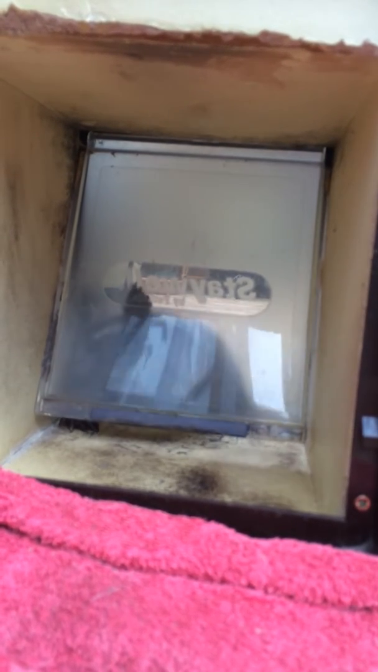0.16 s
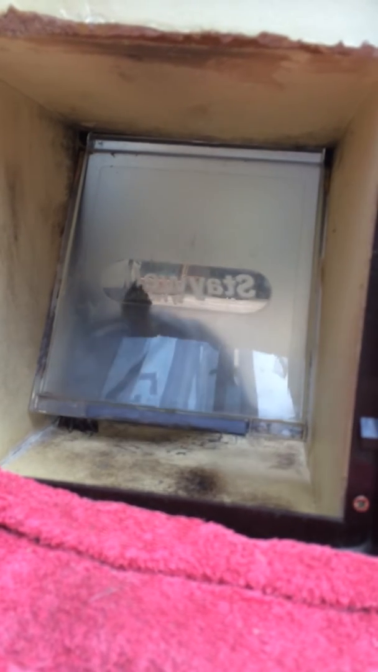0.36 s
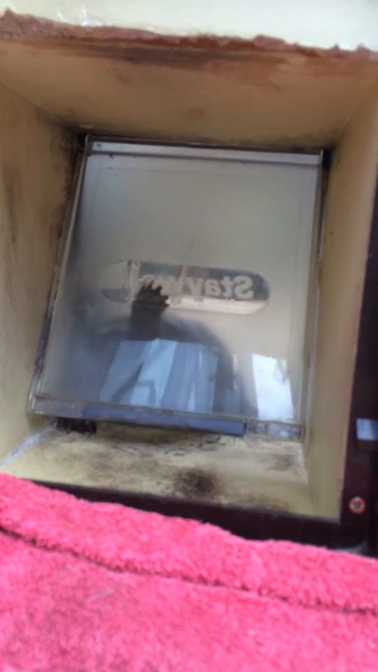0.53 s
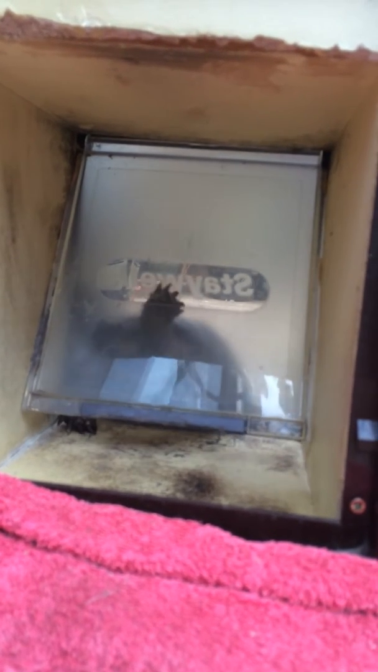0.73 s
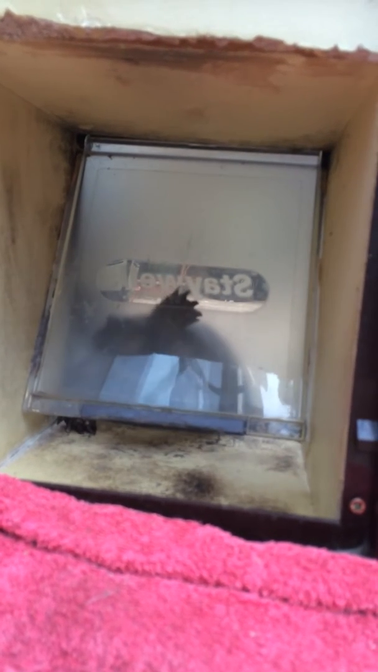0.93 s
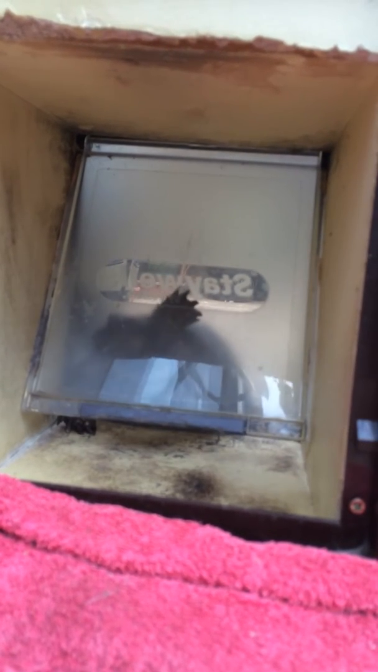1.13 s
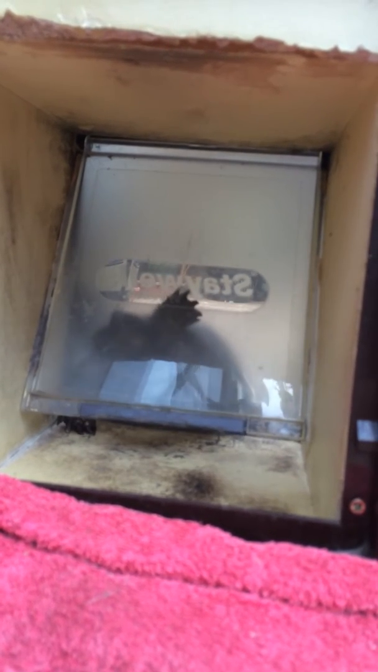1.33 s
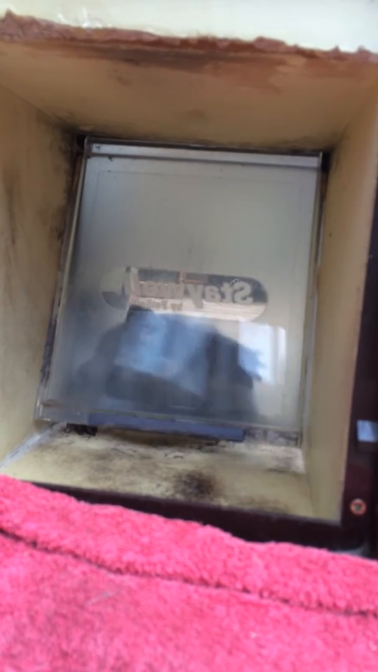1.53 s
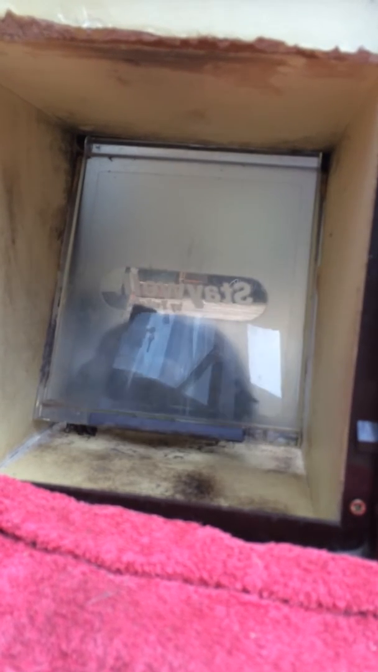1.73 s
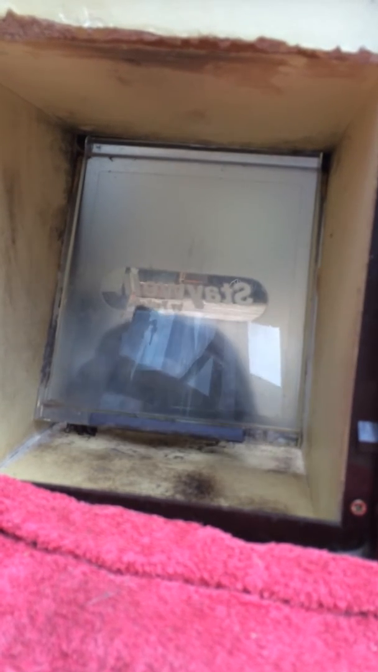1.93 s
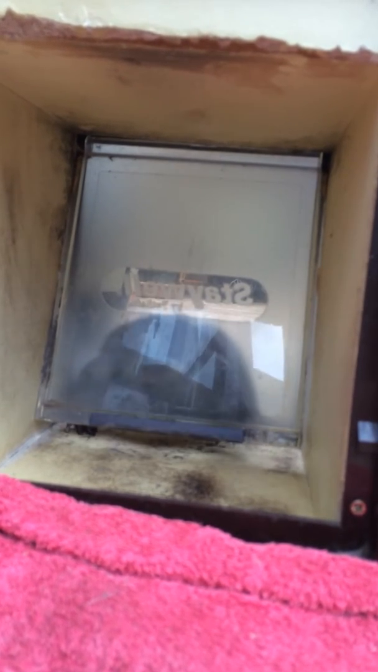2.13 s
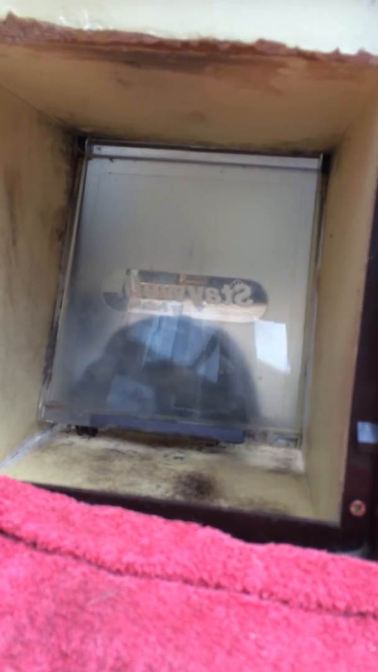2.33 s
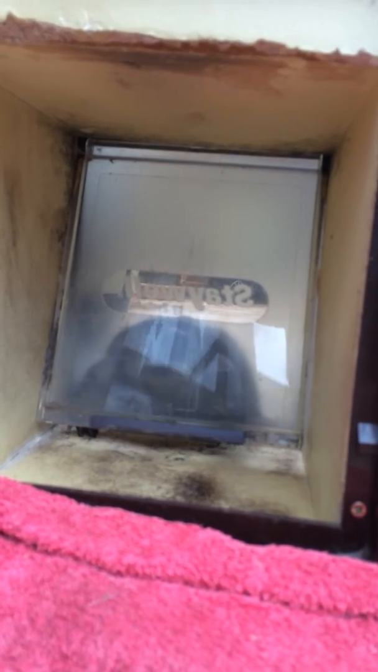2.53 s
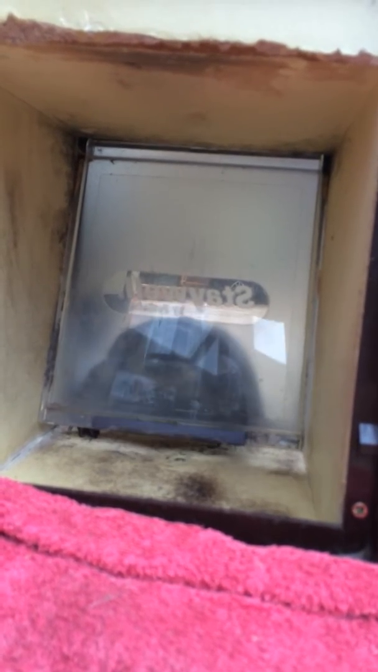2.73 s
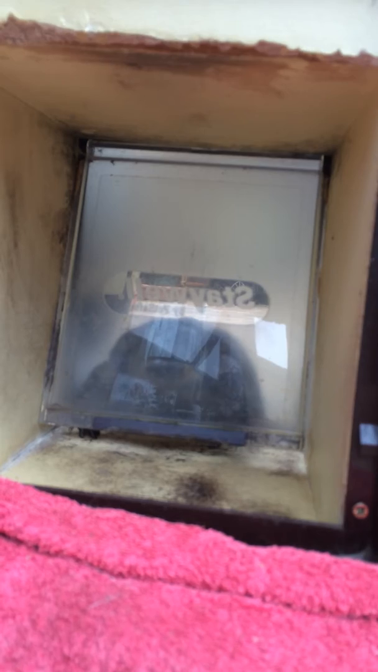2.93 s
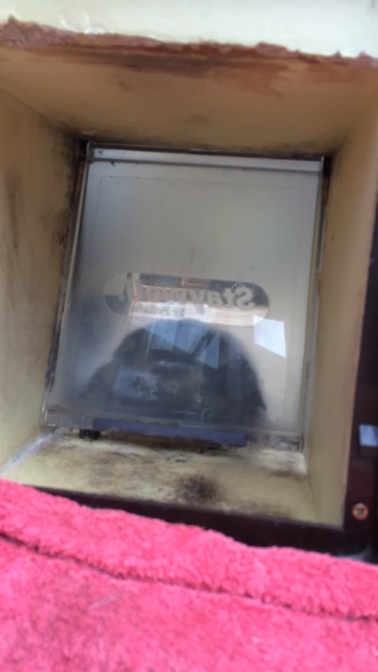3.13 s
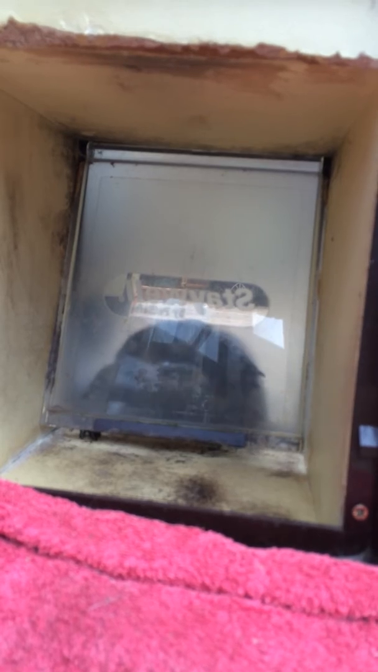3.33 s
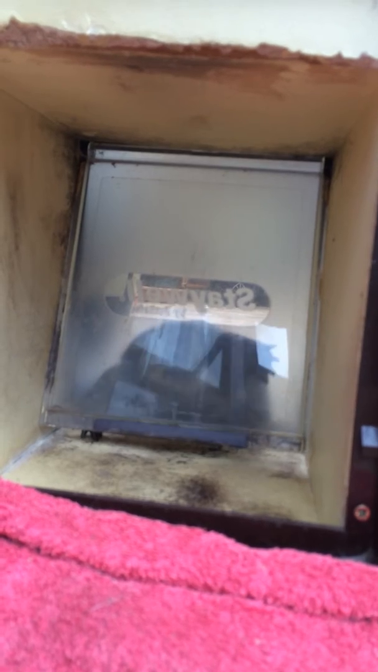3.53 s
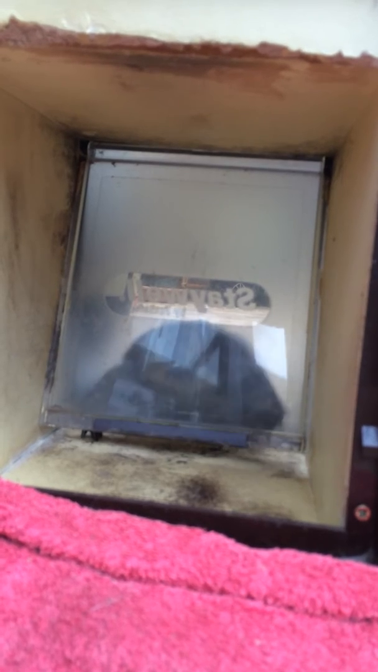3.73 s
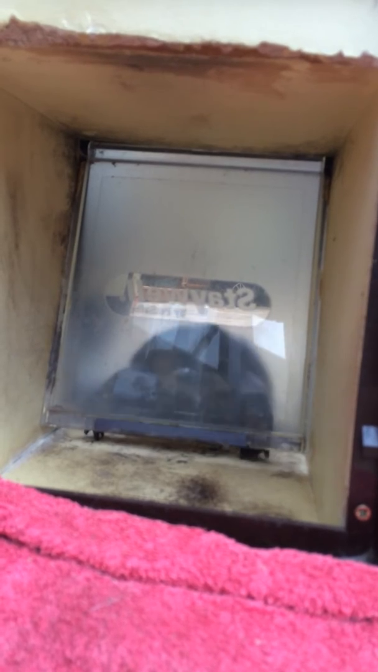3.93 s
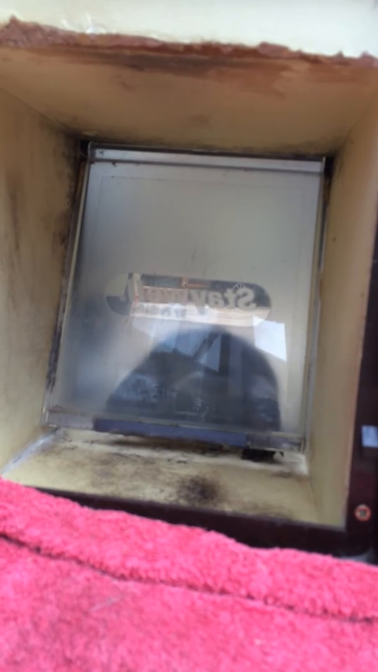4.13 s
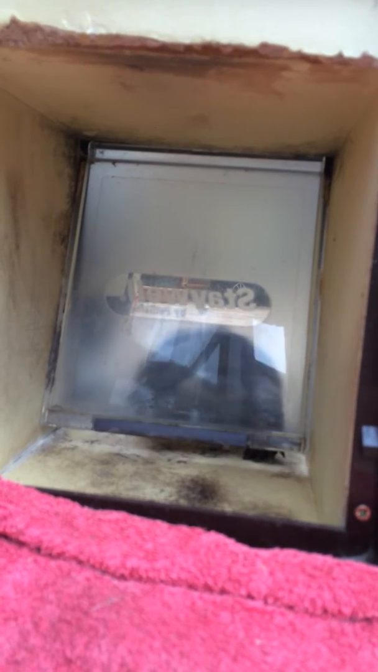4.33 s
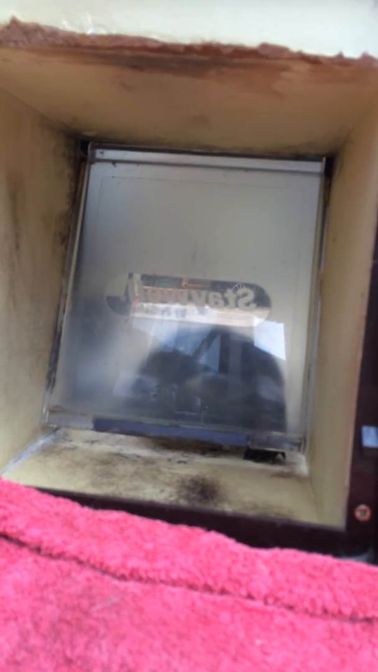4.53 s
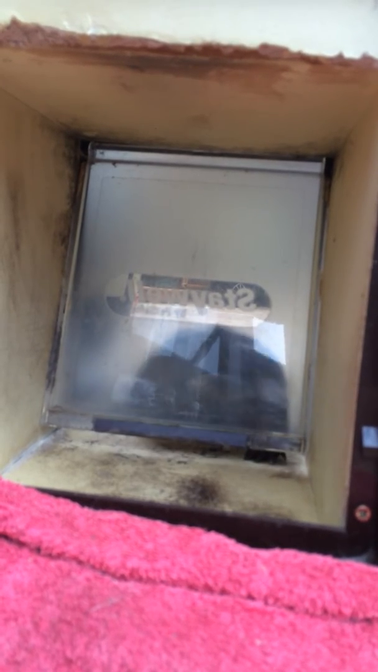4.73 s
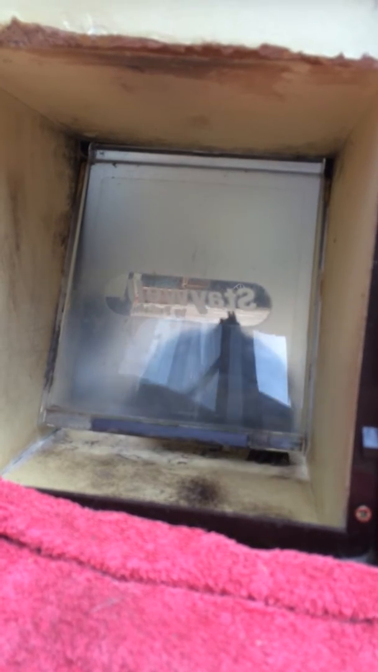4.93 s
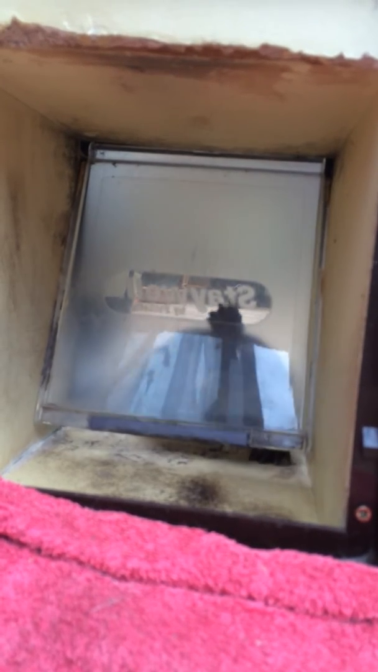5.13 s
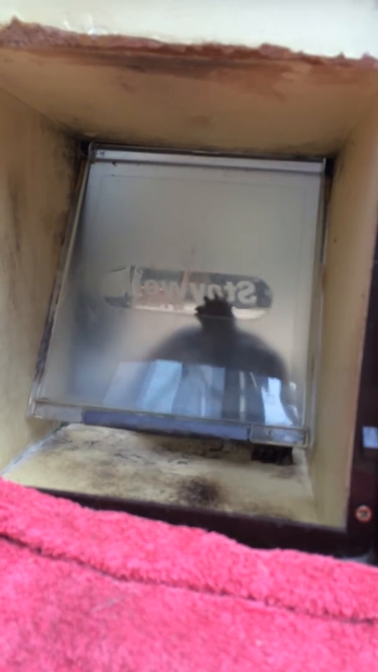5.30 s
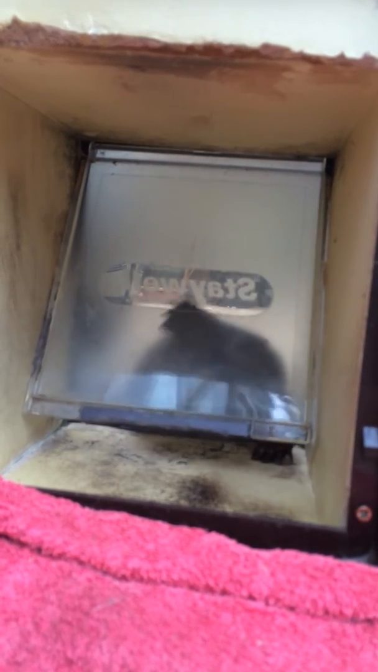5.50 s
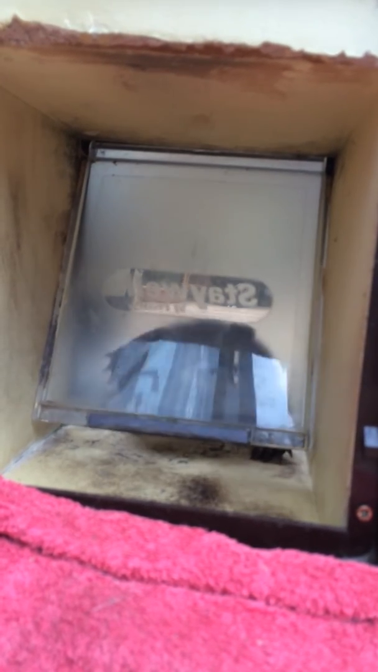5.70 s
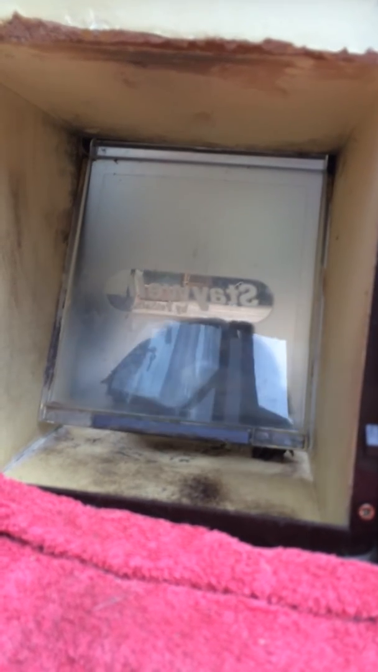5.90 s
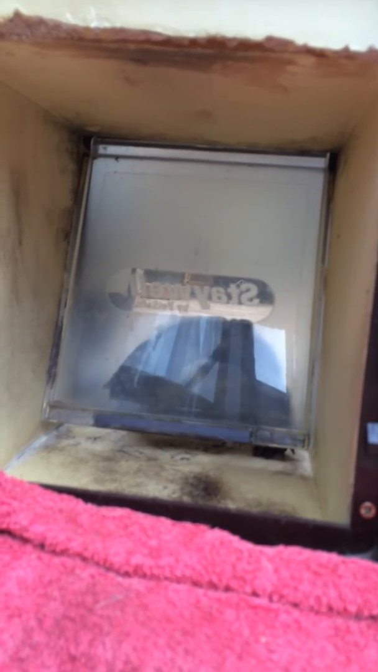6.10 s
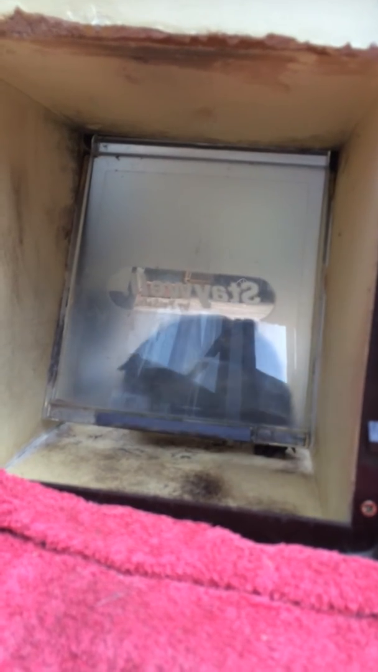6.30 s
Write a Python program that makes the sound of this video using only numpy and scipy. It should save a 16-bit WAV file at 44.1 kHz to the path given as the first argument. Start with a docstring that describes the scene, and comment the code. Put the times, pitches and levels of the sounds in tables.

```python
"""Animal at a cat flap

An animal pushes from outside at a plastic cat flap, close to a phone. The flap shudders, scrapes and
squeaks in its frame and knocks against its stop: the panel booms low, the plastic cracks. Stronger
blows are brighter, and the heaviest bounce once. Small plastic clicks and soft strokes of fur sound
among the knocks, over a quiet room."""
import sys
import numpy as np
from scipy import signal
from scipy.fft import rfft, irfft
from scipy.io import wavfile
from scipy.ndimage import uniform_filter1d

SR = 44100
rng = np.random.default_rng(int(sys.argv[2]) if len(sys.argv) > 2 else 0)


def master_out(mix):
    """Clip the mix to full scale and print it as 16-bit PCM to the path in sys.argv[1]."""
    frames = np.transpose(np.atleast_2d(mix))
    ceiling = np.clip(frames, -1, 1)
    pcm = np.round(ceiling * 32767).astype(np.int16)
    wavfile.write(sys.argv[1], SR, pcm)


N = 284886
TIME = np.arange(N) / SR
AGE = TIME[:SR // 2]  # seconds since a contact


def undb(db):
    """Decibels to gain."""
    return 10 ** (np.asarray(db) / 20)


def decay(t60_s):
    """Exponential decay after a contact."""
    return np.exp(-np.log(1000) * AGE / t60_s)


def unit_rms(x):
    """Scale to rms 1."""
    return x / np.sqrt(np.mean(x ** 2))


def unit_attack(x):
    """Scale to rms 1 over the first 20 ms."""
    return x / np.sqrt(np.mean(x[:SR // 50] ** 2))


def add(out, start_s, x):
    """Mix x into out from start_s."""
    i = max(int(start_s * SR), 0)
    out[i:i + len(x)] += x[:max(N - i, 0)]


def high_pass(x, corner_hz):
    """Second-order bass cut."""
    return signal.sosfilt(signal.butter(2, corner_hz, "high", fs=SR, output="sos"), x)


def colour(x, spectrum, size=4096):
    """Minimum-phase filter through (Hz, dB) points."""
    hz, db = np.transpose(spectrum)
    bin_hz = np.arange(size // 2 + 1) * SR / size
    gain = undb(np.interp(np.log(bin_hz + 1), np.log(hz), db))
    cepstrum = irfft(np.log(gain))
    cepstrum[1:size // 2] *= 2
    cepstrum[size // 2 + 1:] = 0
    response = irfft(np.exp(rfft(cepstrum)))
    return signal.fftconvolve(x, response)[:len(x)]


def drift(rate_hz):
    """Smooth random drift, rms 1."""
    hold = max(int(SR / rate_hz), 1)
    steps = np.repeat(rng.standard_normal(N // hold + 1), hold)
    return unit_rms(uniform_filter1d(uniform_filter1d(steps, hold), hold)[:N])


def ring(modes, scatter_db, detune):
    """Decaying modes; each contact point weights and detunes them a little."""
    draws = rng.standard_normal((len(modes), 2))
    return sum(undb(db + scatter_db * a) * decay(t60_s) * np.sin(2 * np.pi * hz * (1 + detune * b) * AGE)
               for (hz, db, t60_s), (a, b) in zip(modes, draws))


def slips(per_s, spread_db):
    """Stick-slip: randomly timed impulses of unequal size."""
    impulses = (rng.random(N) < per_s / SR) * rng.standard_normal(N)
    return impulses * undb(spread_db * rng.standard_normal(N))


def chatter(t60_s, first_db, tail_db, tail_t60_s):
    """One sharp contact, then a dying buzz of micro-contacts."""
    buzz = rng.standard_normal(len(AGE)) * (decay(t60_s) + undb(tail_db) * decay(tail_t60_s))
    buzz[0] = undb(first_db) * np.linalg.norm(buzz)
    return buzz


def hollow(x, t60_s, share_db):
    """Add the dense resonances of thin plastic, different at every contact point."""
    response = (rng.standard_normal(len(AGE)) * decay(t60_s))[:SR // 16]
    response *= undb(share_db) / np.linalg.norm(response)
    response[0] += 1
    return signal.fftconvolve(x, response)[:len(x)]


# Room background. Each row: frequency in Hz, relative level in dB.
ROOM_SPECTRUM = [(15, -48), (25, -26), (66, -0.5), (109, -4), (172, -2), (271, -16), (309, -8.5),
                 (344, -26.5), (769, -18), (1420, -25.5), (1860, -31), (2560, -36.5), (3630, -42.5),
                 (9270, -47.5), (15000, -45.5)]


def room_tone(level_db=-54.5):
    """A wavering low rumble under steady, faint air."""
    noise = unit_rms(colour(rng.standard_normal(N), ROOM_SPECTRUM))
    rumble = signal.sosfiltfilt(signal.butter(2, 400, fs=SR, output="sos"), noise)
    air = noise - rumble
    return undb(level_db) * (undb(-1.5 + 2 * drift(12)) * rumble + undb(-1) * air)


# Modes of panel and door. Each row: frequency in Hz, relative level in dB, T60 in seconds.
PANEL_MODES = [(55.4, -17, 0.051), (74.6, -13.5, 0.16), (106.5, -6.5, 0.2), (129, -7.5, 0.24),
               (163.6, -10.5, 0.17), (182.6, 2, 0.13), (217, -3, 0.084), (256, -2, 0.082),
               (301.6, -7.5, 0.14), (331.1, -7, 0.163), (411, -18.5, 0.17)]
# The animal leans on the panel. Each row: start in seconds, end in seconds, level in dB.
SHUDDER_SPANS = [(0.0, 0.29, -44), (1.465, 1.617, -35.5), (3.898, 4.187, -48.5), (4.923, 5.137, -46.5),
                 (5.232, 5.446, -39), (5.814, 5.936, -46)]


def shudders():
    """Many soft nudges keep the panel's low modes rumbling."""
    force = sum(undb(db) * swell(start_s, end_s) for start_s, end_s, db in SHUDDER_SPANS)
    nudges = signal.sosfilt(signal.butter(2, 200, fs=SR, output="sos"), slips(per_s=930, spread_db=0.5))
    rumble = signal.fftconvolve(nudges, ring(PANEL_MODES, scatter_db=1.5, detune=0.013))[:N]
    return force * unit_rms(high_pass(rumble, corner_hz=45))


def swell(start_s, end_s):
    """A rounded rise and fall."""
    progress = np.clip((TIME - start_s) / (end_s - start_s), 0, 1)
    return np.sqrt(np.abs(np.sin(np.pi * progress)))


# Modes of the hard plastic. Each row: frequency in Hz, relative level in dB, T60 in seconds.
PLASTIC_MODES = [(450, 14.5, 0.04), (633, -4, 0.11), (825, -3, 0.083), (955.4, 2, 0.053),
                 (1300, -15, 0.035), (1330, -5, 0.055), (1700, 1.5, 0.036), (1862, -5.5, 0.089),
                 (2073, -4.5, 0.074), (2310, -16, 0.065), (3525, -5.5, 0.049), (3770, -21.5, 0.014),
                 (4254, -5, 0.059), (5270, 1, 0.022), (5770, -13.5, 0.016), (6900, -31, 0.023)]


def through_plastic(x, ring_db):
    """Contact noise plus the ring it leaves in flap and frame."""
    body = ring(PLASTIC_MODES, scatter_db=2, detune=0.002)
    return x + undb(ring_db) * signal.fftconvolve(x, body / np.linalg.norm(body))[:len(x)]


# Fur friction. Each row: frequency in Hz, relative level in dB.
FUR_SPECTRUM = [(300, -2), (1000, 0.5), (1900, 1.5), (2800, -2), (5500, -2), (8000, -4.5), (11000, -9),
                (16000, -12.5)]
# Strokes of fur. Each row: middle in seconds, length in seconds, level in dB, treble gain in dB.
FUR_STROKES = [(0.22, 0.46, -69, -7.5), (1.162, 0.5, -66, -27), (1.725, 0.2, -70, 4.5),
               (2.149, 0.16, -54.5, -11.5), (2.338, 0.64, -70.5, -10), (2.628, 0.13, -67, -21),
               (2.842, 0.14, -64.5, -4), (3.28, 0.71, -64.5, -1), (3.51, 0.68, -62.5, -7.5),
               (4.036, 0.5, -59.5, -15), (4.5, 0.31, -63, 1), (4.848, 0.75, -60, -6.5),
               (5.298, 0.34, -61.5, -4), (5.48, 0.26, -68, 10), (5.74, 0.51, -62, 1), (6.43, 0.37, -63, 6)]


def rubbing(resting_db=-77, treble_hz=3950):
    """Fur rests on the panel and brushes it: fine, uneven friction that swells with each stroke."""
    grain = slips(per_s=9000, spread_db=0.5) * undb(1.4 * drift(45))
    fur = unit_rms(through_plastic(colour(grain, FUR_SPECTRUM), ring_db=-12))
    out = undb(resting_db) * fur
    for middle_s, length_s, db, treble_db in FUR_STROKES:
        span = np.abs(TIME - middle_s) < length_s / 2
        brush = unit_rms(hollow(fur[span], t60_s=0.037, share_db=-3.5))
        dull = signal.sosfiltfilt(signal.butter(2, treble_hz, fs=SR, output="sos"), brush)
        pressure = undb(db) * np.cos(np.pi * (TIME[span] - middle_s) / length_s) ** 2
        out[span] += pressure * (dull + undb(treble_db) * (brush - dull))
    return out


# Snap of a hard contact. Each row: frequency in Hz, relative level in dB.
SNAP_SPECTRUM = [(500, -19.5), (2000, 1.5), (3500, -3.5), (5500, 1), (7500, -3.5), (10000, -8),
                 (13000, -14), (16000, -20.5)]
# Small plastic clicks. Each row: start in seconds, level in dB.
PLASTIC_TICKS = [(0.0725, -61.5), (0.478, -48), (0.516, -49), (0.524, -39.5), (0.841, -66.5), (0.8622, -58),
                 (1.52, -41), (1.6818, -62), (1.992, -70.5), (3.851, -61), (3.935, -61), (4.026, -67),
                 (4.3764, -51.5), (4.714, -66), (4.971, -61), (5.088, -62), (5.58, -37.5), (5.601, -40.5),
                 (5.622, -44.5), (5.65, -40.5)]


def ticks():
    """Small bright plastic clicks, alone or on top of knocks and scrapes."""
    out = np.zeros(N)
    for start_s, db in PLASTIC_TICKS:
        contact = chatter(t60_s=0.02, first_db=-7, tail_db=-11, tail_t60_s=0.099)
        click = colour(hollow(contact, t60_s=0.097, share_db=-16), SNAP_SPECTRUM)
        add(out, start_s, undb(db) * unit_attack(high_pass(click, corner_hz=2400)))
    return out


# Plastic sliding on plastic. Each row: frequency in Hz, relative level in dB.
SCRAPE_SPECTRUM = [(400, -12), (1300, -5.5), (2200, -1), (3000, -3), (4500, -3), (6000, 0.5), (8000, -4.5),
                   (10000, -7.5), (13000, -17), (16000, -18)]


def graze():
    """The surfaces brush ever harder in the last milliseconds before a knock."""
    friction = colour(rng.standard_normal(len(AGE)) * decay(t60_s=0.073), SCRAPE_SPECTRUM)
    return unit_attack(friction)[:SR // 80][::-1]


def panel_boom(force_db, push_s=0.0023, flex_delay_s=0.00076):
    """A half-sine push sets the panel booming; it bends just after the contact."""
    contact_s = push_s * undb(-0.067 * force_db)  # gentle blows stay in contact longer
    push = np.sin(np.pi * np.minimum(AGE[:SR // 100] / contact_s, 1))
    modes = ring(PANEL_MODES, scatter_db=3.04, detune=0.011)
    boom = -signal.fftconvolve(modes, push)[:len(AGE)]
    boom = high_pass(boom, corner_hz=62)  # a small panel gives off little deep bass
    return np.interp(AGE - flex_delay_s, AGE, unit_attack(boom), left=0)


# Crack of the frame. Each row: frequency in Hz, relative level in dB.
CRACK_SPECTRUM = [(200, -19), (520, -6.5), (900, 5), (1500, -4), (2100, -7.5), (2700, -11), (4000, -20),
                  (8000, -48), (16000, -37)]


def knock(force_db, hardness_db):
    """One blow: returns the leading graze and the hit, a boom with the contact's crack and snap."""
    boom = panel_boom(force_db)
    buzz = chatter(t60_s=0.036, first_db=-13, tail_db=-12.5, tail_t60_s=0.15)
    plastic = ring(PLASTIC_MODES, scatter_db=1.5, detune=0.00054)
    crack = unit_attack(unit_attack(colour(buzz, CRACK_SPECTRUM)) + unit_attack(plastic))
    contact = chatter(t60_s=0.01, first_db=-0.5, tail_db=-24.5, tail_t60_s=0.13)
    snap = unit_attack(colour(hollow(contact, t60_s=0.043, share_db=5.5), SNAP_SPECTRUM))
    boom_db = -20 + force_db
    crack_db = -36.5 + 0.98 * force_db + hardness_db / 2
    snap_db = -43 + 1.84 * force_db + hardness_db  # grows fastest: stronger blows are brighter
    hit = undb(boom_db) * boom + undb(crack_db) * crack + undb(snap_db) * snap
    return undb(snap_db - 21.5) * graze(), hit


# Blows on the stop. Each row: time in seconds, force in dB re a firm knock, contact hardness in dB.
FLAP_BLOWS = [(0.0733, -20, -1), (0.168, -24, 0), (0.193, -22, 3), (0.4691, -7, -5.5), (0.4827, 3.5, 2),
              (0.494, -2, -4), (0.538, -1, -0.5), (0.683, -18.5, 17), (0.708, 0.5, 3), (0.841, -17.5, -23),
              (0.8719, -1, 1.5), (1.447, -8.5, 3), (1.575, -1, 8), (2.299, -26, -1), (2.648, -33.5, 6),
              (2.774, -30.5, -1), (3.153, -15, 1.5), (3.483, -21.5, -14), (3.55, -19.5, -4),
              (3.79, -4.5, 5.5), (4.98, -23.5, -8), (5.088, -20.5, -10), (5.25, -11, -9),
              (5.348, -2.5, 4.5), (5.528, -3, 3.5), (5.548, 6.5, -1.5), (5.589, 0, -11)]


def knocks(bounce_above_db=0, bounce_s=0.016, bounce_db=-17.5, bounce_hardness_db=24.5):
    """The flap strikes its stop; the heaviest blows bounce once, lightly, on its edge."""
    out = np.zeros(N)
    bounces = [(time_s + bounce_s, force_db + bounce_db, bounce_hardness_db)
               for time_s, force_db, _ in FLAP_BLOWS if force_db > bounce_above_db]
    for time_s, force_db, hardness_db in list(FLAP_BLOWS) + bounces:
        lead, hit = knock(force_db, hardness_db)
        add(out, time_s - len(lead) / SR, lead)
        add(out, time_s, hit)
    return out


# Drags along the frame. Each row: start in seconds, end in seconds, final level in dB, low cut in Hz.
EDGE_DRAGS = [(0.514, 0.528, -35, 900), (1.504, 1.599, -41.5, 4370), (3.692, 3.793, -44, 3800),
              (4.37, 4.478, -45, 2520), (4.564, 4.575, -55.5, 1790), (4.79, 4.816, -55, 1400),
              (5.325, 5.345, -40, 700), (5.531, 5.535, -28.5, 1200), (5.553, 5.594, -34.5, 700),
              (5.636, 5.673, -40, 1840), (5.772, 5.786, -54.5, 3500)]


def scrapes(rise_db_per_s=100, attack_share=0.27, release_s=0.01):
    """The flap's edge drags grittily on the frame, wedging ever tighter until it slips free."""
    out = np.zeros(N)
    grain = slips(per_s=9000, spread_db=3) * undb(0.55 * drift(180))
    grit = through_plastic(colour(grain, SCRAPE_SPECTRUM), ring_db=-4)
    for start_s, end_s, db, low_cut_hz in EDGE_DRAGS:
        length_s = end_s - start_s
        stroke = hollow(grit[int(start_s * SR):][:len(AGE)], t60_s=0.0074, share_db=-1.5)
        stroke = unit_rms(high_pass(stroke, low_cut_hz))
        pressure = undb(db - rise_db_per_s * np.maximum(length_s - AGE, 0))
        attack = 1 - np.exp(-AGE / (attack_share * length_s))
        release = np.exp(-np.maximum(AGE - length_s, 0) / release_s)
        add(out, start_s, pressure * attack * release * stroke)
    return out


# Friction tones. Each row: start and end in seconds, start and end pitch in Hz, width in Hz, level in dB.
SQUEAK_GLIDES = [(3.329, 3.578, 1848, 1744, 199.8, -64.5), (3.717, 3.793, 4840, 6700, 993, -56.5),
                 (3.927, 4.176, 2000, 2320, 706, -71.5), (4.396, 4.482, 6620, 5620, 707, -56),
                 (5.675, 5.912, 3530, 3500, 69.7, -71)]


def squeaks():
    """Unsteady, narrow-band stick-slip tones that glide with the sliding speed."""
    out = np.zeros(N)
    for start_s, end_s, start_hz, end_hz, width_hz, db in SQUEAK_GLIDES:
        pitch_hz = np.interp(TIME, [start_s, end_s], [start_hz, end_hz])
        phase = 2 * np.pi * np.cumsum(pitch_hz) / SR
        tone = unit_rms(drift(width_hz) * np.cos(phase) + drift(width_hz) * np.sin(phase))
        out += undb(db) * swell(start_s, end_s) * tone
    return out


def reverb(x, gain_db, t60_s, delay_s=0.012):
    """The room answers late and dull."""
    spectrum = [(60, -2), (250, 2.5), (600, -9.5), (4000, -5), (15000, -22)]
    tail = colour(rng.standard_normal(len(AGE)), spectrum) * decay(t60_s) * (AGE > delay_s)
    return undb(gain_db) * signal.fftconvolve(x, tail)[:N]


def scene():
    """The flap in its room, mono."""
    flap = knocks() + ticks() + scrapes() + squeaks() + shudders() + rubbing()
    return (flap + reverb(flap, gain_db=-47, t60_s=0.42) + room_tone())[None]


def record(dry):
    """The phone drops the deepest bass and cuts the top."""
    top_hz = 15500
    treble_cut = signal.ellip(8, 0.2, 70, top_hz, fs=SR, output="sos")
    return signal.sosfilt(treble_cut, high_pass(dry, corner_hz=32))


dry = scene()
out = record(dry)
master_out(out)
```